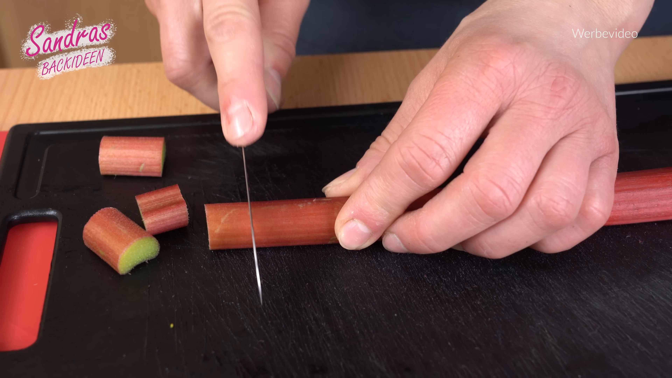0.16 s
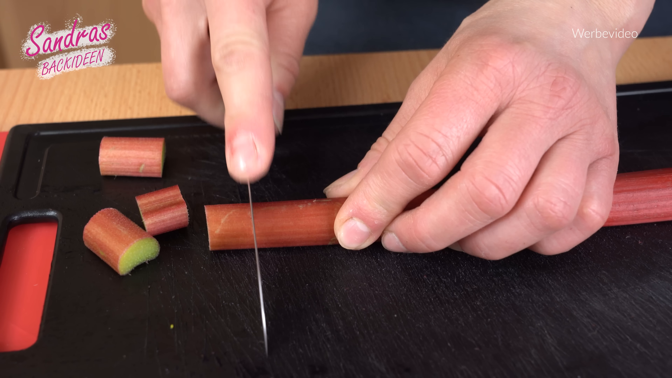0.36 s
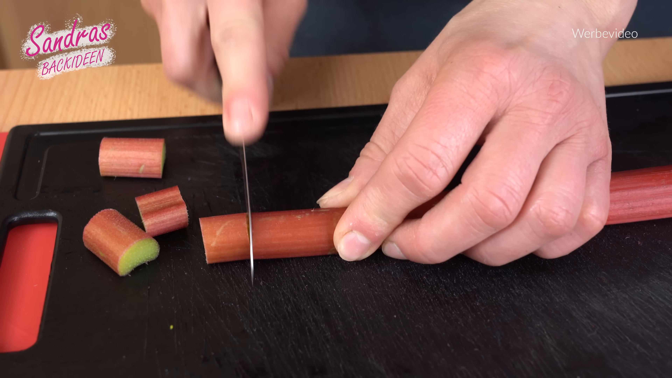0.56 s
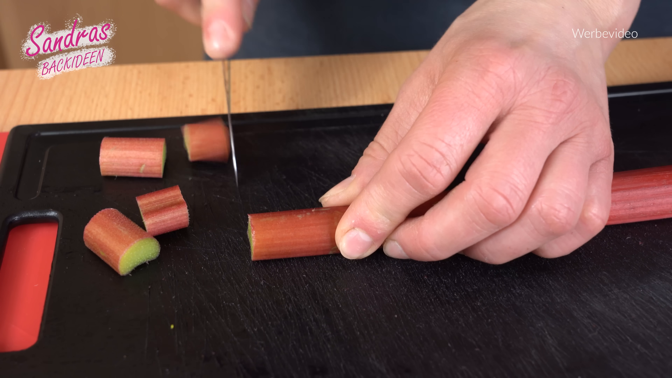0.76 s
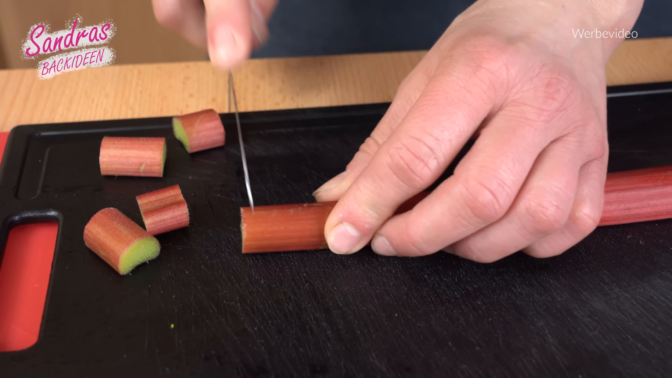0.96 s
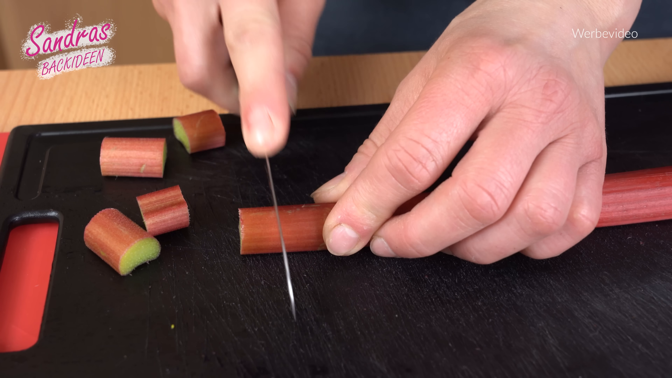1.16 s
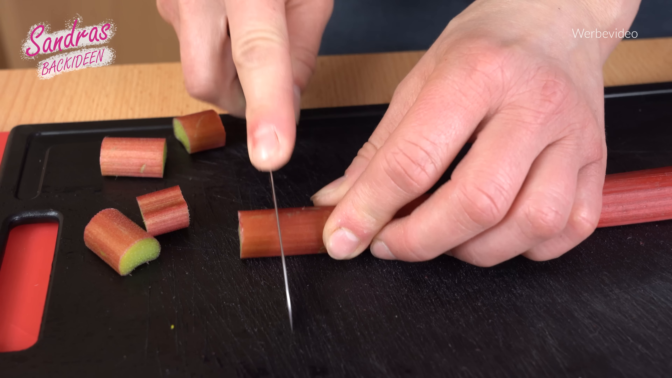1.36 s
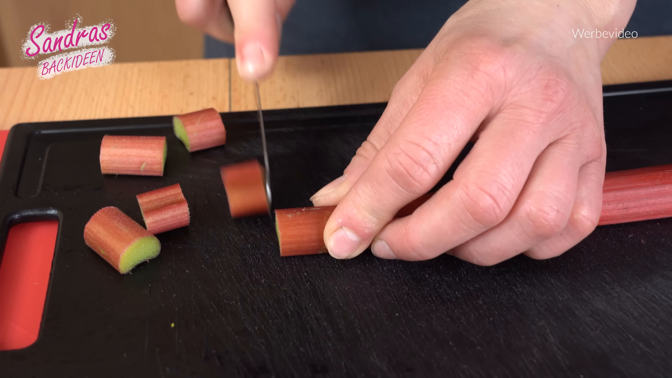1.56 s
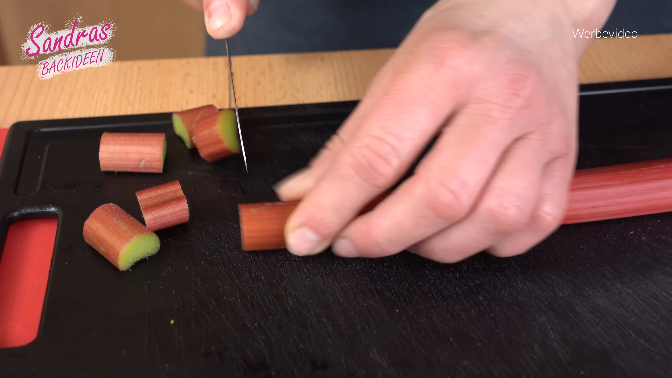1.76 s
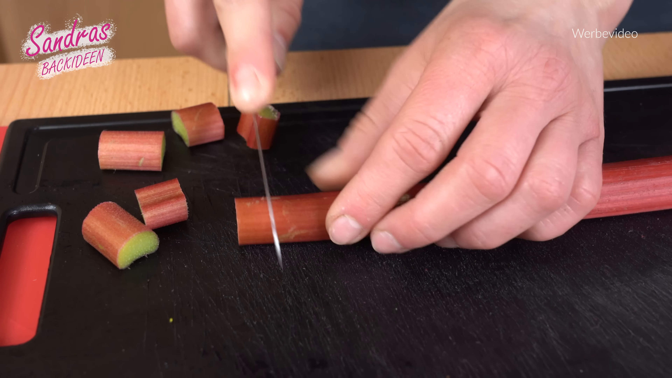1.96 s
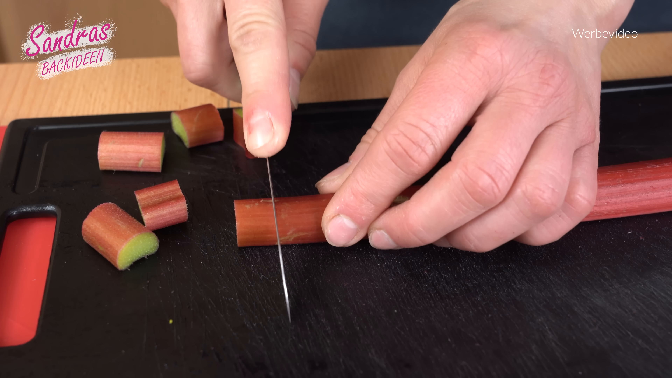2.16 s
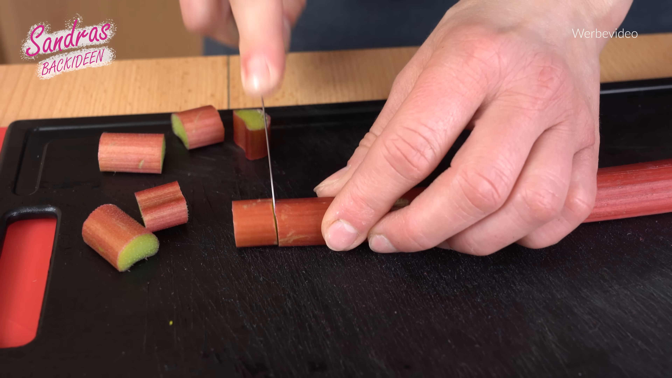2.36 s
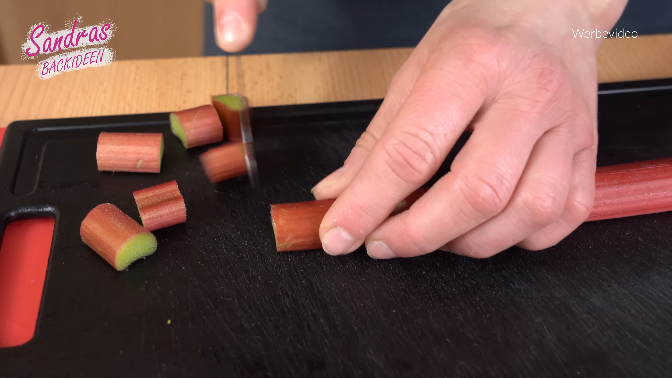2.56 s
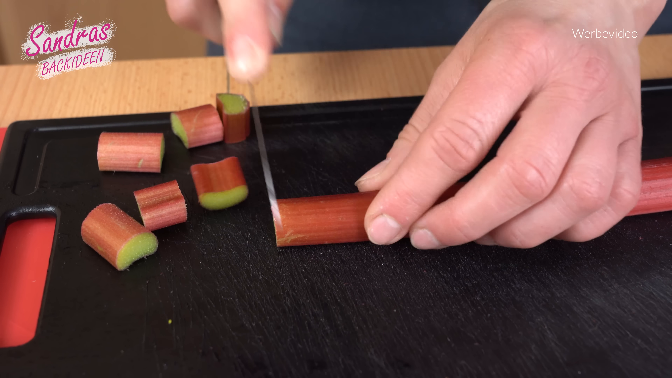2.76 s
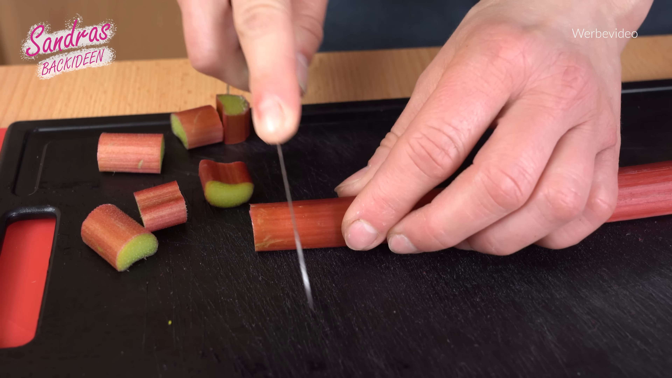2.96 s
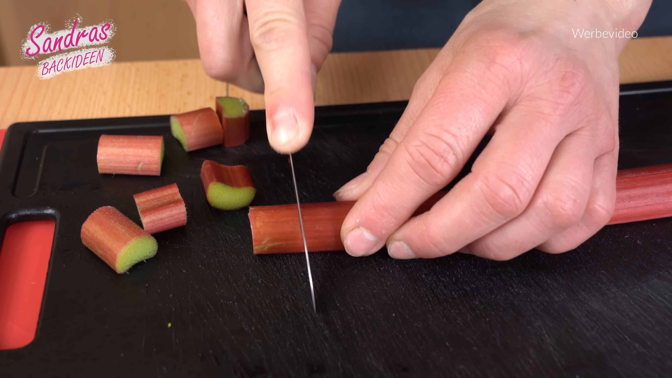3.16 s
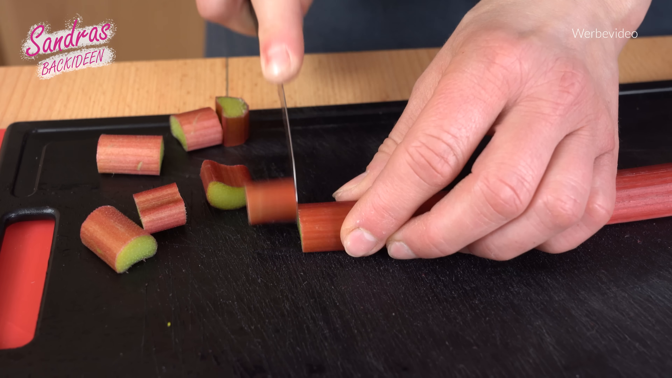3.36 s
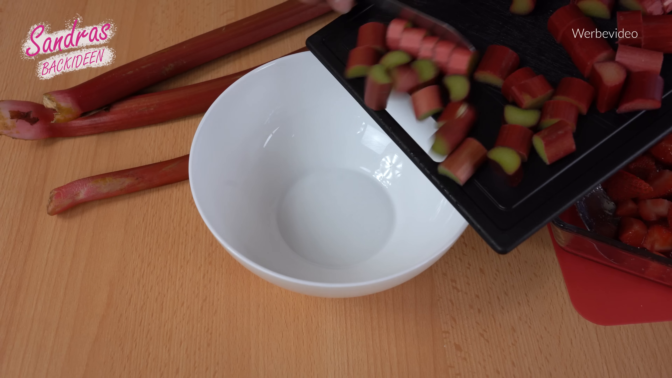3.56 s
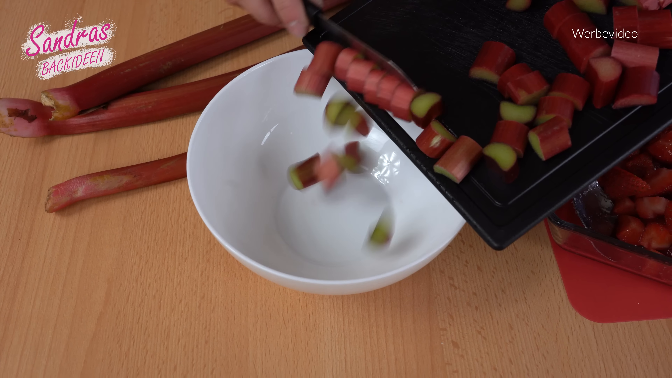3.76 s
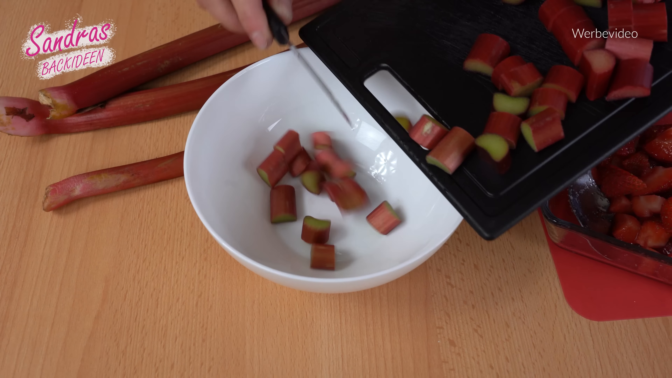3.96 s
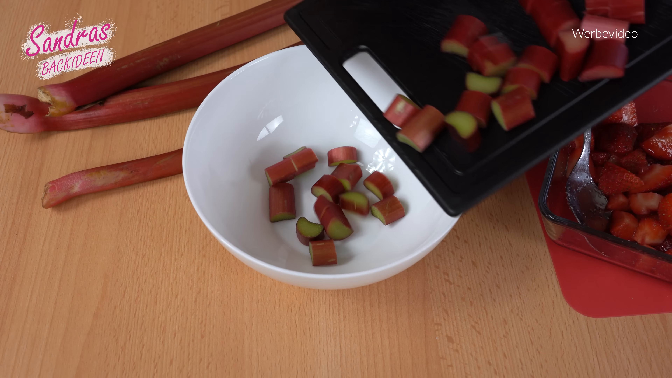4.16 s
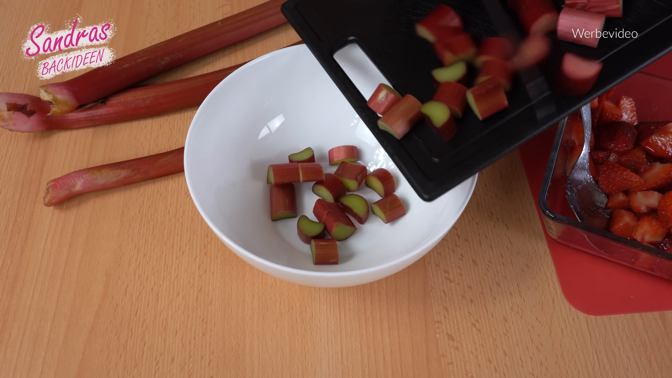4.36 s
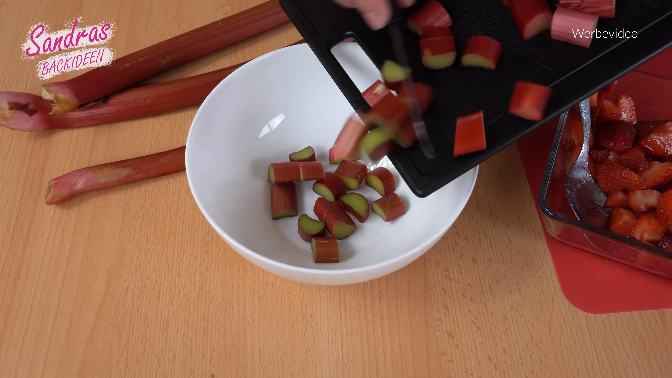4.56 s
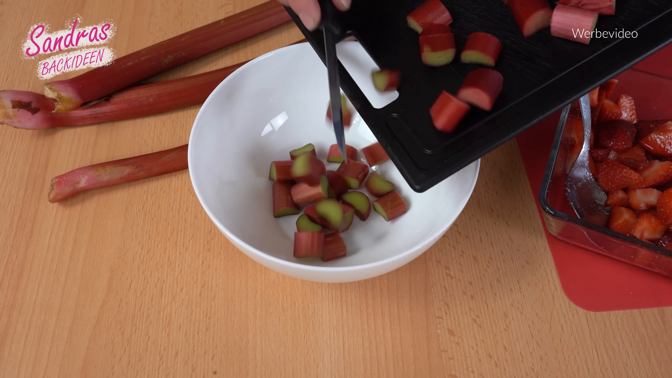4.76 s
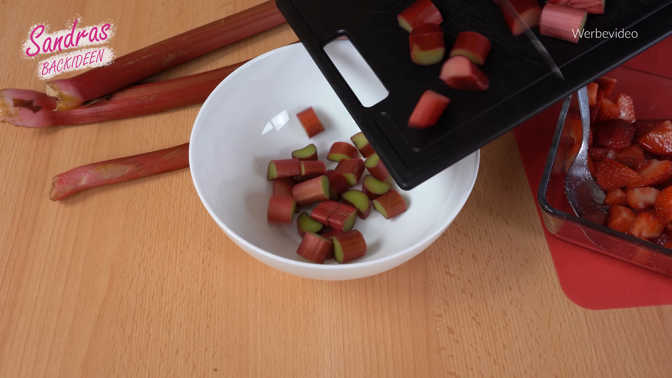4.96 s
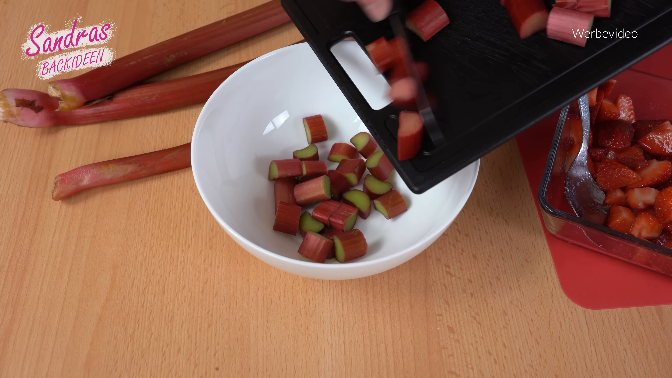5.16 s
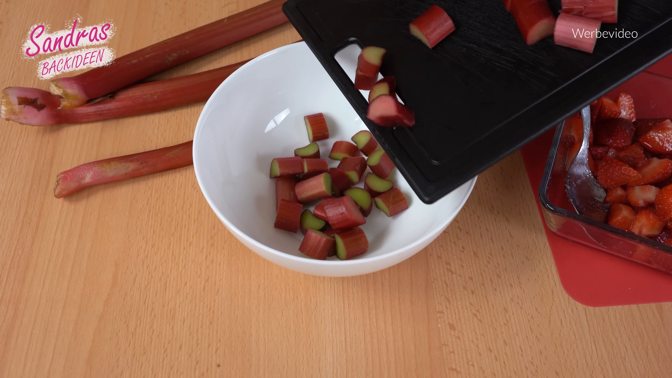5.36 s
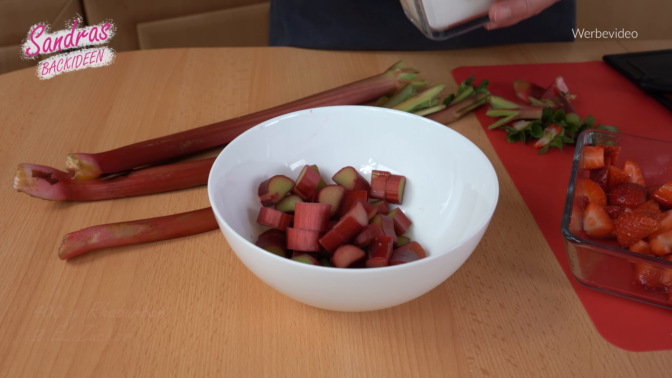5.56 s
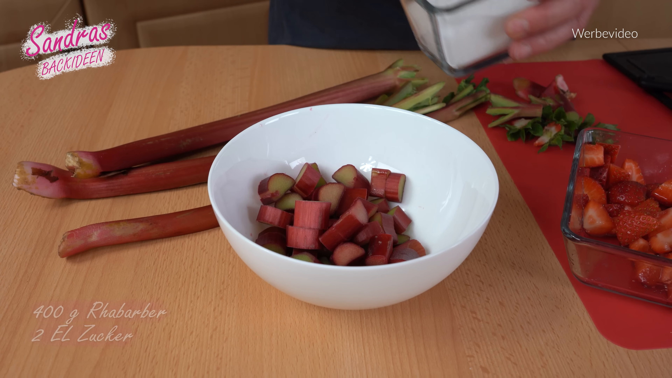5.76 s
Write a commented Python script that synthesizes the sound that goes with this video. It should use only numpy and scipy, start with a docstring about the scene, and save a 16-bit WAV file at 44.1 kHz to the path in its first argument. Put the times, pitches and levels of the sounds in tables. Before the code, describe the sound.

A close microphone in a small kitchen with short, soft reverberation over faint hiss and deep rumble. A knife cuts crisp stalks on a plastic board: crunchy cracks and a board knock at 0.25-0.4 s, then a dry gritty scrape from 0.5 to 0.7 s ending in a tick. The next cut crackles at about 1.3 s and scrapes until 1.6 s; another at 2.2 s scrapes until 2.5 s, followed by a single loud, pitched snap at 2.55 s. The last cut comes around 3.1-3.2 s, its scrape lasting to 3.45 s. From 3.6 s pieces tumble into a bowl, densest at 3.75-4.1 s, with hollow low thuds and small rim ticks. A sharp scrape and knocks come at 4.4 s, softer drops at 4.6-4.95 s, a bright blade sweep at 5.1 s, and light bumps at 5.4 s. By 5.6 s everything stops except quiet room hush.

```python
"""A knife crunches through rhubarb stalks on a plastic board and scrapes each piece aside: stick-slip grit,
with pitched cracks as fibres snap. Then pieces thud and tumble in a bowl, ringing its modes, while the blade
sweeps the lifted board in short bursts of the same kind of grit. At the end only the hush of the small kitchen
remains: shaped noise and a deep rumble. The microphone is close by."""
import sys
import numpy as np
from scipy import signal
from scipy.fft import rfft, irfft, next_fast_len
from scipy.io import wavfile
from scipy.ndimage import uniform_filter1d

SR = 44100
rng = np.random.default_rng(int(sys.argv[2]) if len(sys.argv) > 2 else 0)


def wav_record(signal):
    """Record a signal, one row per channel, as 16-bit PCM in the file named by sys.argv[1]."""
    frames = np.transpose(np.atleast_2d(signal))
    bounded = np.clip(frames, -1, 1)
    # unit amplitude maps onto the largest positive 16-bit level
    quanta = np.round(bounded * 32767).astype(np.int16)
    wavfile.write(sys.argv[1], SR, quanta)


N = 259806
T = np.arange(N) / SR

# modes of the plastic board: pitch_hz, level_db (relative), t60_s
BOARD_MODES = [(204.6, -5.5, 0.069), (249.3, -1.5, 0.076), (275.5, 2.5, 0.052), (350.5, 1.5, 0.051),
               (409.5, -1, 0.056), (515, 3.5, 0.046), (688, 0.5, 0.039), (1052, -1, 0.065)]
# modes of the table under board and bowl: pitch_hz, level_db (relative), t60_s
TABLE_MODES = [(80, -16.5, 0.17), (90.6, -5.5, 0.32), (126.8, -0.5, 0.13)]


def undb(db):
    """dB to gain."""
    return 10 ** (np.asarray(db) / 20)


def unit(x):
    """Scales to rms 1."""
    return x / np.sqrt(np.mean(x ** 2))


def peak(x):
    """Scales to peak 1."""
    return x / np.max(np.abs(x))


def fade(n, t60):
    """Falls 60 dB in t60 s, at sample numbers n."""
    return np.exp(-np.log(1000) * n / (t60 * SR))


def band(x, lo_hz, hi_hz, order=2):
    """Band-pass."""
    sos = signal.butter(order, [lo_hz, min(hi_hz, .45 * SR)], "bandpass", fs=SR, output="sos")
    return signal.sosfilt(sos, x)


def below(x, hz):
    """Gentle low-pass without delay."""
    return signal.sosfiltfilt(signal.butter(1, hz, fs=SR, output="sos"), x)


def colour(x, tone):
    """Shapes a noise by (Hz, dB) points, joined on a logarithmic pitch scale."""
    hz, db = np.transpose(tone)
    n = next_fast_len(len(x))
    f = np.arange(n // 2 + 1) * SR / n + 1
    gain = undb(np.interp(np.log(f), np.log(hz), db))
    return irfft(rfft(x, n) * gain, n)[:len(x)]


def ring(x, modes):
    """Decaying modes set ringing by the force x; neighbours swing in opposite sense."""
    force = x + 1e-18  # keeps the filters out of vanishingly small numbers
    y = 0
    for k, (hz, db, t60) in enumerate(modes):
        pole = np.exp(2j * np.pi * hz / SR - np.log(1000) / (t60 * SR))
        swing = signal.lfilter([0, pole.imag], [1, -2 * pole.real, abs(pole) ** 2], force)
        y = y + (-1) ** k * undb(db) * swing
    return y


def grit(per_s, spread_db):
    """Dense random slips of unequal size."""
    chance, size = rng.random(N), rng.standard_normal(N)
    sign = np.sign(rng.standard_normal(N))
    return unit((chance < per_s / SR) * sign * undb(spread_db * np.clip(size, -2, 2)))


def flicker(rate, depth_db):
    """Uneven contact: random levels held 1 / rate s, slewed."""
    k = int(SR / rate)
    held = np.repeat(rng.standard_normal(N // k + 1), k)[:N]
    return undb(depth_db * uniform_filter1d(held, k))


def hush():
    """Room tone and microphone hiss as shaped noise, and a deep rumble as a narrow noise near 42 Hz."""
    # spectrum of room tone and hiss: pitch_hz, level_db (relative, per Hz)
    hush_tone = [(12, -26.5), (20, -22), (45, -22), (70, -7.5), (198, -16.5), (270, -19.5), (527, -14.5),
                 (759, -24), (1710, -27), (1910, -31.5), (2200, -30), (4540, -32), (16000, -35)]
    # course of the rumble: time_s, level_db
    rumble_course = [(0.0, -63.5), (0.9, -54.5), (1.5, -52), (2.2, -57.5), (3.1, -62.5), (4.8, -60),
                     (5.88, -63.5)]
    s, db = np.transpose(rumble_course)
    rumble = unit(band(rng.standard_normal(N), 34, 52.7)) * undb(np.interp(T, s, db))
    tone = undb(-57.5) * unit(colour(rng.standard_normal(N), hush_tone))
    return tone + rumble


def kitchen(x, wet_db):
    """Diffuse room tail, built octave by octave from noise with its own decay in each."""
    # decay of the room: pitch_hz, t60_s
    room_decay = [(100, 0.68), (500, 0.43), (2000, 0.32), (6000, 0.16), (14000, 0.22)]
    hz, t60 = np.transpose(room_decay)
    after_s = np.arange(int(.7 * SR)) / SR
    tail = 0
    for f in 88 * 2 ** np.arange(8):
        octave = band(rng.standard_normal(len(after_s)), f / 2 ** .5, f * 2 ** .5)
        tail = tail + octave * undb(-60 * after_s / np.interp(np.log(f), np.log(hz), t60))
    tail *= np.clip(after_s / 0.0033 - .5, 0, 1)  # the tail enters a moment after the direct sound
    tail /= np.sqrt(np.sum(tail ** 2))
    return x + undb(wet_db) * signal.fftconvolve(x, tail)[:N]


def rim():
    """Hard touches on the bowl wall sound the high modes near their pitch; pieces against it make them waver."""
    # high modes of the bowl: pitch_hz, level_db (relative), t60_s
    rim_modes = [(2480, -5, 1), (2915, -1, 0.27), (3780, 3.5, 0.14), (4220, -8, 0.46), (5200, -3, .17),
                 (7210, -4.5, 0.29)]
    # touches: start_s, level_db, favoured pitch_hz, fall of the other modes in db_per_octave
    rim_hits = [(3.801, -49.5, 7210, 32), (3.81, -55, 2915, 37), (3.94, -52.5, 4220, 62),
                (4.039, -57, 2915, 32), (4.389, -44, 3780, 7), (4.5, -55.5, 3780, 60)]
    out, tap = np.zeros(N + SR), 1. * (np.arange(SR // 2) == 0)
    for s, level_db, pitch_hz, fall_db in rim_hits:
        modes = [(hz, db + level_db - fall_db * abs(np.log2(hz / pitch_hz)), t60) for hz, db, t60 in rim_modes]
        i = int(s * SR)
        out[i:i + len(tap)] += ring(tap, modes)
    return out[:N] * flicker(70, 4.2)


def bowl():
    """Landing pieces push softly on the modes near their pitch and slap; small bumps roll in between."""
    # modes of the bowl: pitch_hz, level_db (relative), t60_s
    bowl_modes = [(272, -11, 0.078), (318, 3.5, 0.093), (409, 4.5, 0.038), (463, 4.5, 0.069),
                  (484, 4, 0.055), (586, 1, 0.065), (698, -3.5, 0.066), (862, -0.5, 0.028),
                  (945, -3.5, 0.052), (1004, -1, 0.024)]
    # landings: start_s, level_db, strongest pitch_hz, hardness_db (slap re level)
    drops = [(3.615, -28.5, 540, -20), (3.631, -35, 436, -10), (3.655, -23.5, 407, -22),
             (3.692, -36.5, 400, -2), (3.755, -16.5, 690, -31), (3.768, -16, 320, -29),
             (3.802, -11.5, 700, -31), (3.815, -12, 317, -32), (3.857, -19.5, 318, -23),
             (3.873, -16, 307, -23), (3.893, -25, 320, -13.5), (3.937, -31.5, 318, -7.5),
             (3.97, -26, 483, -14), (4.019, -24, 315, -12), (4.033, -14.5, 304, -15),
             (4.087, -21.5, 580, -17), (4.098, -20.5, 315, -29), (4.114, -26, 583, -25),
             (4.334, -32, 449, -17), (4.389, -15, 412, 1), (4.414, -13.5, 500, -27), (4.423, -12, 500, -29),
             (4.457, -14, 494, -18), (4.495, -31, 523, -12), (4.587, -24.5, 284, -20),
             (4.705, -28.5, 312, -26), (4.733, -20, 380, -10), (4.747, -18.5, 333, -42),
             (4.787, -23, 388, -18), (4.837, -24, 334, -21), (4.911, -27, 314, -31),
             (4.935, -24.5, 382, -18.5), (5.344, -31, 400, -10), (5.406, -27, 417, -13),
             (5.418, -23, 320, -30)]
    # pieces rolling on each other: time_s, level_db
    tumble = [(3.612, -49), (3.75, -51), (3.762, -40), (3.912, -30.5), (3.984, -38), (4.126, -49),
              (4.191, -53), (4.422, -61), (4.582, -73), (4.642, -51), (5.02, -49), (5.155, -76),
              (5.354, -51.5), (5.54, -53), (5.58, -53)]
    drop_thud_db, roll_thud_db = -16.5, -8.5  # table drive re a landing; table level re the rolling
    out, weight = np.zeros(N + SR), np.zeros(N)
    where = rng.standard_normal((len(drops), len(bowl_modes) + 600))
    push = np.zeros(SR // 3)
    push[:30] = np.hanning(30)
    for (s, level_db, pitch_hz, hard_db), chance in zip(drops, where):
        modes = []
        for (hz, db, t60), c in zip(bowl_modes, chance):
            # pieces already lying in the bowl shift its modes a little
            favoured_db = db + 2 * c - 11.0 * abs(np.log2(hz / pitch_hz))
            modes.append((hz * (1 + c / 40), favoured_db, t60))
        i, noise = int(s * SR), chance[len(bowl_modes):]
        out[i:i + len(push)] += undb(level_db - 5.5) * peak(ring(push, modes))
        slap = band(noise * fade(np.arange(len(noise)), 0.013), 390, 2370, order=3)
        out[i:i + len(noise)] += undb(level_db + hard_db) * peak(slap)
        weight[i] = undb(level_db + drop_thud_db)
    s, db = np.transpose(tumble)
    bumps = np.convolve(grit(200, 5.0), np.hanning(30), "same")
    moving = bumps * undb(np.interp(T, s, db, left=-200, right=-200))
    rolling = ring(moving, bowl_modes) / np.std(ring(bumps, bowl_modes))
    table = TABLE_MODES[-1:]  # its highest mode alone
    under = undb(roll_thud_db) * ring(moving, table) / np.std(ring(bumps, table))
    return out[:N] + rolling + under + ring(weight, table)


def strokes(rows):
    """Four layer gains: each stroke touches, swells or sinks to a turn, moves on to its lift level, dies away."""
    # how fast level, treble, thrum and thud die away: speed (factor on the fade rate)
    fade_speed = [1.08, 1.3, 0.92, 0.57]
    lift_treble_db, lift_s = -6.5, 0.0067  # the treble drops as the edge leaves
    treble_sag_db_per_s = 27  # after the turn the edge slows and dulls
    gains = np.zeros((4, N))  # level, treble, thrum, thud
    for s, touch_db, to_turn, turn_db, contact, lift_db, fade_rate, *above_db in rows:
        turn = s + to_turn
        lift = turn + contact
        pressed = np.interp(T, [s, turn, lift], [touch_db, turn_db, lift_db], left=-200)
        after = np.maximum(T - lift, 0)
        leaving = lift_treble_db * np.minimum(after / lift_s, 1)
        sag = treble_sag_db_per_s * np.maximum(T - turn, 0)
        change_db = [0, leaving - sag, 0, 0]
        for gain, db, speed, change in zip(gains, [0] + above_db, fade_speed, change_db):
            gain += undb(pressed + db + change - speed * fade_rate * after)
    return uniform_filter1d(gains, size=60, axis=1)


def shifting(x, hz, depth_db):
    """As the contact point slides, the parts under and over hz swell apart."""
    low = below(x, hz)
    return low * flicker(18, depth_db) + (x - low) * flicker(20, depth_db)


def chatter():
    """The edge catches and slips in an uneven cycle near 140 Hz, bright at each slip, stronger at some moments."""
    phase = np.cumsum(140 * flicker(60, 2.5) / SR) % 1
    strength = np.minimum(flicker(12, 3.4), 1.4)
    return undb(8 * strength * (np.exp(-phase / 0.21) - 0.57))


def rubbing(rows, tone, per_s, spread_db, rough_db, thrum_hz, blade_db):
    """Stick-slip grit, board and table thrum below, singing blade; each stroke's treble share dulls as it goes on."""
    # modes of the blade: pitch_hz, level_db (relative), t60_s
    blade_modes = [(700, 20.5, 0.029), (1030, -29, 0.045), (1330, -5, 0.063), (1416, 0, 0.04),
                   (1790, -4, 0.059), (1930, 11, 0.022), (2230, -21, 0.055), (2790, -4, 0.064),
                   (3340, -22, .05), (3850, -19, .05), (4970, -6, .05), (5690, 4, 0.075),
                   (6840, -26, 0.059), (7670, 4, .05), (10300, -2, .05)]
    mid_gain, treble_gain, thrum_gain, thud_gain = strokes(rows)
    slips = grit(per_s, spread_db) * flicker(90, rough_db)
    rasp = colour(slips, tone)
    mid = below(rasp, 3500)
    # the thin edge skips faster than the body of the blade, so the treble flickers on its own
    treble = shifting(rasp - mid, 8300, 0.32) * flicker(350, 3.9) * chatter()
    mid = shifting(mid, 1740, 1.4)
    edge = mid_gain * unit(mid) + treble_gain * unit(treble)
    # the steel sings most where no table damps the board
    singing = undb(blade_db) * ring(edge, blade_modes)
    push = band(slips, thrum_hz / 2, thrum_hz * 2, order=1)
    thrum = ring(thrum_gain * push, BOARD_MODES) / np.std(ring(push, BOARD_MODES))
    thud = ring(thud_gain * slips, TABLE_MODES) / np.std(ring(slips, TABLE_MODES))
    return edge + singing + undb(-6.5) * (thrum + thud)


def sweeps():
    """The blade sweeps the lifted board: grit with the strongest singing of the steel."""
    # strokes: start_s, touch_db, to_turn_s, turn_db, contact_s (after the turn), lift_db, fade_db_per_s (nominal),
    # then re level: treble_db, board thrum_db, table thud_db
    sweep_strokes = [(4.36, -61, 0.028, -47, 0.0022, -47, 900, -9, 9, 3),
                     (4.388, -34, 0.0018, -43, 0.042, -39, 148, -22, 15, -16),
                     (5.082, -33, 0.039, -29, 0.036, -39, 166, -9.5, -4, -24)]
    # spectrum of the grit: pitch_hz, level_db (relative)
    sweep_tone = [(290, -50.5), (500, -40), (678, -20.5), (974, -14.5), (1050, 0), (1340, -2), (1620, -4),
                  (1980, -13), (3650, -16), (4800, -12.5), (6420, -12.5), (9770, -12), (16000, -25)]
    return rubbing(sweep_strokes, sweep_tone, 12000, 3.4, 1.0, 510, -40.0)


def scrapes():
    """The blade edge drags over the board: the densest grit."""
    # strokes: start_s, touch_db, to_turn_s, turn_db, contact_s (after the turn), lift_db, fade_db_per_s (nominal),
    # then re level: treble_db, board thrum_db, table thud_db
    scrape_strokes = [(0.354, -32, .002, -31.5, 0.025, -35.5, 111, -9, -4.5, -0.5),
                      (0.458, -49, 0.011, -54, 0.017, -59, 400, 7.5, -11, -2),
                      (0.51, -51, 0.072, -31.5, 0.12, -34.5, 125, 0, -3, -13),
                      (0.745, -43, 0.011, -46.5, 0.054, -48, 192, -6.5, 1, -10),
                      (1.414, -40.5, .11, -31, 0.081, -36, 120, -1, -2, -8.5),
                      (1.77, -66, 0.04, -56, .03, -63, 149, -27, 0, -5),
                      (2.308, -39.5, .11, -30, 0.083, -35.5, 108, -1.5, -2, -6),
                      (2.78, -70, 0.028, -63, 0.0064, -57.5, 300, -27, 11.5, 6),
                      (3.2, -38, 0.14, -29, 0.11, -35.5, 140, -2, -2, -1.5)]
    # spectrum of the grit: pitch_hz, level_db (relative)
    scrape_tone = [(470, -21.5), (800, 0.5), (953, -6.5), (1020, -2), (1190, -2.5), (1520, -2), (1760, 4.5),
                   (2130, -2.5), (2630, -1.5), (2870, -5), (6090, -4), (6650, -4.5), (11400, -8),
                   (15000, -19), (16000, -8)]
    return rubbing(scrape_strokes, scrape_tone, 14000, 4.3, 0.35, 175, -60.5)


def snaps():
    """Fibres snap and the blade ticks: a pitched crack with a room tail, a treble tick, a knock into the board."""
    # cracks: start_s, crack_db, pitch_hz, treble_db (re crack), knock_db (re crack)
    cracks = [(0.244, -38, 1620, 9.5, -18), (0.2576, -32, 1640, 0, -1), (0.2703, -31.5, 1000, 12.5, 5),
              (0.3537, -21.5, 1250, 7.5, 3), (0.362, -22, 1530, -2, -3), (0.3704, -21, 1330, 6.5, 5.5),
              (0.3782, -25.5, 1780, -13, 5.5), (0.591, -40, 2140, -12, -25),
              (0.7041, -21.5, 1770, 3.5, -6.5), (1.266, -38.5, 1330, 14, -5), (1.2871, -27.5, 1330, 9, 0),
              (1.297, -25, 1400, 8, -12), (1.3063, -23.5, 1610, -14, -4), (1.3237, -26.5, 1560, 5, -25),
              (1.42, -31.5, 1190, 9.5, -8), (1.4526, -26, 2150, 10.5, -16), (1.8657, -41.5, 1190, 3, -16),
              (1.995, -46.5, 1000, -15, 0), (2.1868, -29.5, 1330, -1, -16), (2.2084, -23.5, 1330, 0.5, -14),
              (2.2451, -28.5, 1740, 1.5, 1), (2.3124, -29, 1210, 4, -24), (2.3331, -23.5, 1840, 2, -15),
              (2.5245, -26.5, 1020, 3, -7), (2.5546, -8, 1865, -21, -27), (2.7916, -47, 1270, -18, -4),
              (2.8317, -40, 1150, -18, -17.5), (3.0777, -43, 1390, -2, -7),
              (3.1546, -33.5, 1660, -0.5, -1.5), (3.2038, -19.5, 1680, -4, -3.5),
              (3.579, -49, 1500, 6, -10), (3.8012, -31.5, 1000, -1.5, -6), (4.333, -58, 910, 15, 2),
              (4.3881, -21.5, 945, 0.5, 0), (5.0715, -25, 796, -26, -2), (5.0815, -22, 1930, 0, -4),
              (5.1505, -28, 1350, 0, -33)]
    tail_db, tail_t60_s = -25.5, 0.42  # the room rings on around the pitch of a crack
    out, force = np.zeros(N + SR), np.zeros(N)
    chance = rng.standard_normal((len(cracks), SR // 4))
    n = np.arange(SR // 4)
    for (s, db, hz, treble_db, knock_db), noise in zip(cracks, chance):
        i = int(s * SR)
        blow = (n == 0) * 4. + noise * fade(n, .008)
        crack = band(blow, hz / 1.08, hz * 1.12) + 0.8 * band(blow, hz / 1.35, hz * 1.45, order=3)
        echo = band(noise, hz / 1.22, hz * 1.46, order=3) + 0.29 * band(noise, hz * 2, hz * 2.84)
        tail = undb(tail_db) * unit(echo) * fade(n, tail_t60_s)
        tick = band(blow, 4540, 7300) + 0.36 * band(blow, 3100, 11300)
        out[i:i + len(n)] += undb(db) * (peak(crack) + tail) + undb(db + treble_db) * peak(tick)
        force[i] += undb(db + knock_db)
    return out[:N] + undb(-13.5) * ring(force, BOARD_MODES) + undb(-15) * ring(force, TABLE_MODES)


def cuts():
    """The knife presses through the stalks: sparser, rougher grit."""
    # strokes: start_s, touch_db, to_turn_s, turn_db, contact_s (after the turn), lift_db, fade_db_per_s (nominal),
    # then re level: treble_db, board thrum_db, table thud_db
    cut_strokes = [(0.19, -59, 0.033, -52, 0.042, -54.5, 120, -2.5, -6, 5),
                   (0.274, -42, 0.0036, -49, 0.011, -54, 75, -16, 1, 2),
                   (1.254, -49.5, 0.028, -44, 0.039, -45, 120, -5, 6, 1.5),
                   (2.11, -54, 0.027, -50, 0.044, -47, 88, -5.5, 5.5, 0),
                   (3.076, -60, .004, -60.5, 0.046, -65.5, 100, 1.5, 0, 6),
                   (3.145, -49, .011, -57, 0.0065, -57, 200, -11, 0, 11)]
    # spectrum of the grit: pitch_hz, level_db (relative)
    cut_tone = [(470, -78), (800, -1), (1340, -4.5), (1460, -3), (1660, 0), (2130, -12.5), (3140, -4),
                (4180, -3), (4510, -2.5), (7000, 4.5), (8130, -5), (9450, 1.5), (10300, -11), (12300, -5),
                (16000, -21)]
    return rubbing(cut_strokes, cut_tone, 9000, 3.5, 2.5, 400, -90)


def scene():
    """Knife, board and bowl in the kitchen, over its hush."""
    close = cuts() + scrapes() + sweeps() + snaps() + bowl() + rim()
    action = kitchen(band(close, 54.8, 16300), -9)
    still = np.clip((5.58 - T) / 0.0099, 0, 1)  # all but the hush falls quiet at once, by 5.58 s
    return (action * still + hush())[None]


def record(dry):
    """The recorder cuts the top with a steep low-pass at 15.9 kHz."""
    return signal.sosfilt(signal.ellip(10, .2, 60, 15900, fs=SR, output="sos"), dry)


dry = scene()
out = record(dry)
wav_record(out)
```